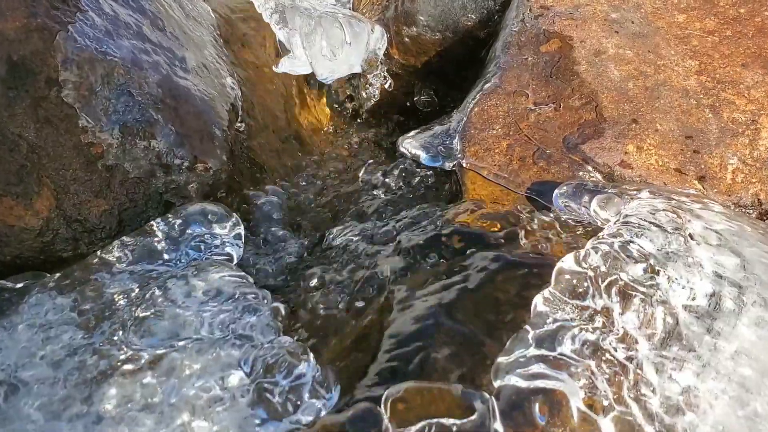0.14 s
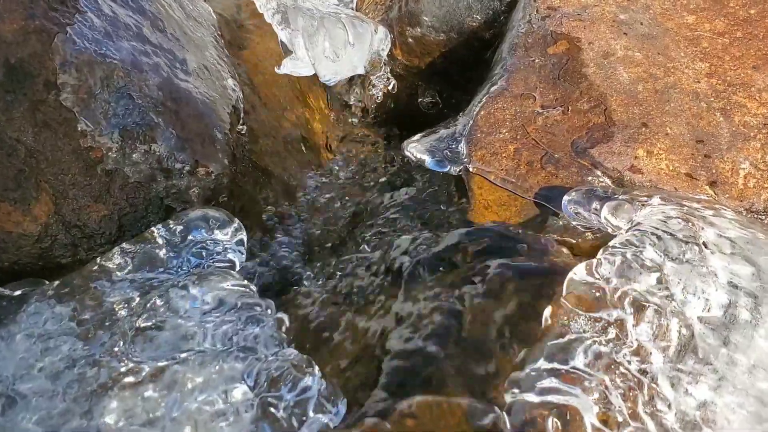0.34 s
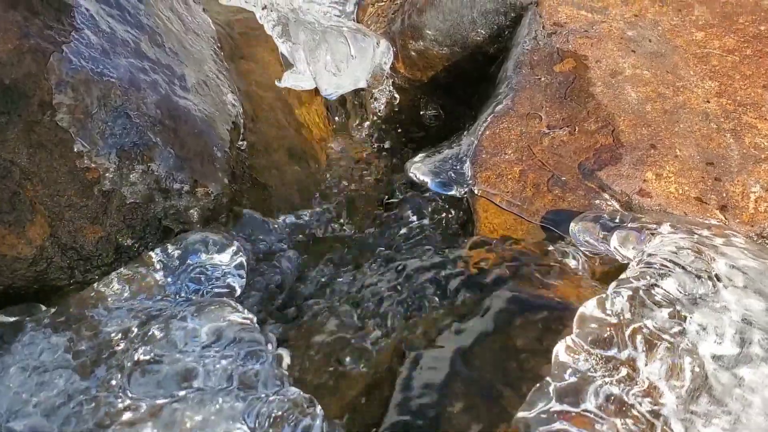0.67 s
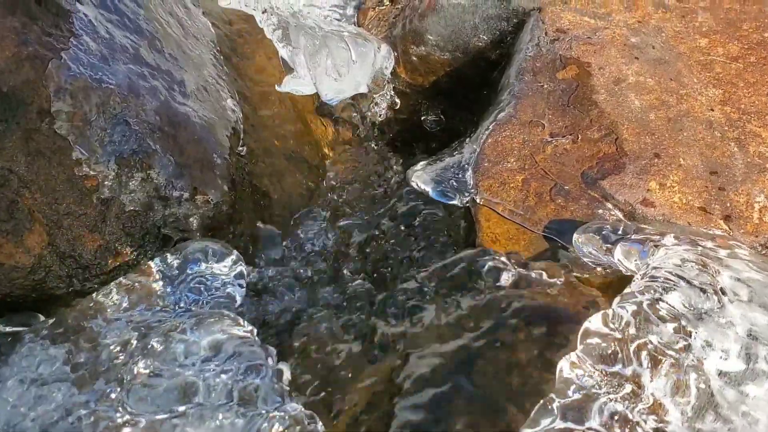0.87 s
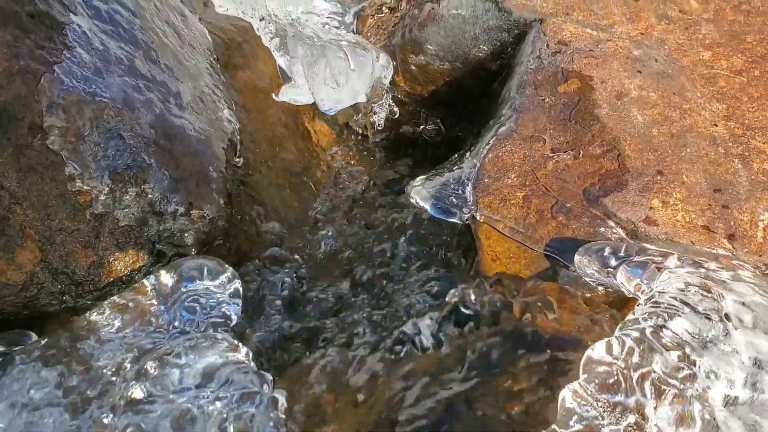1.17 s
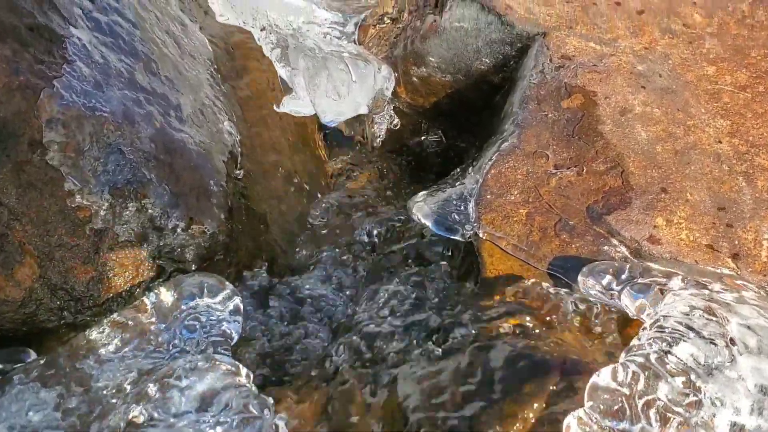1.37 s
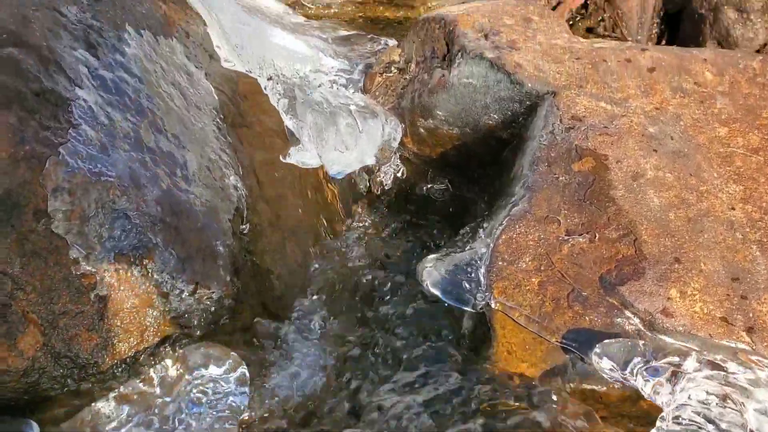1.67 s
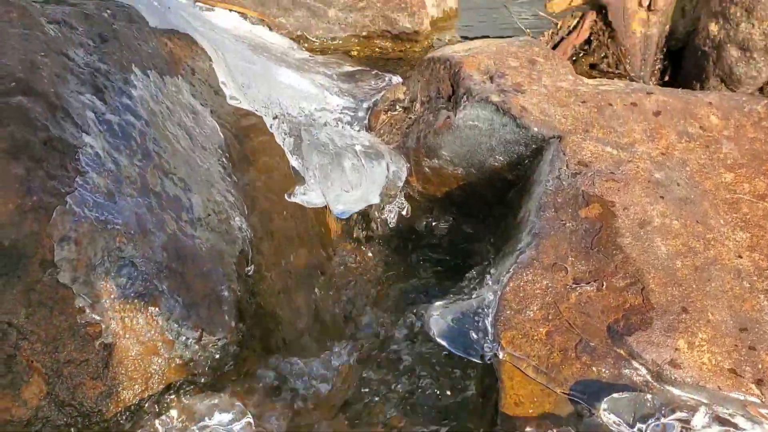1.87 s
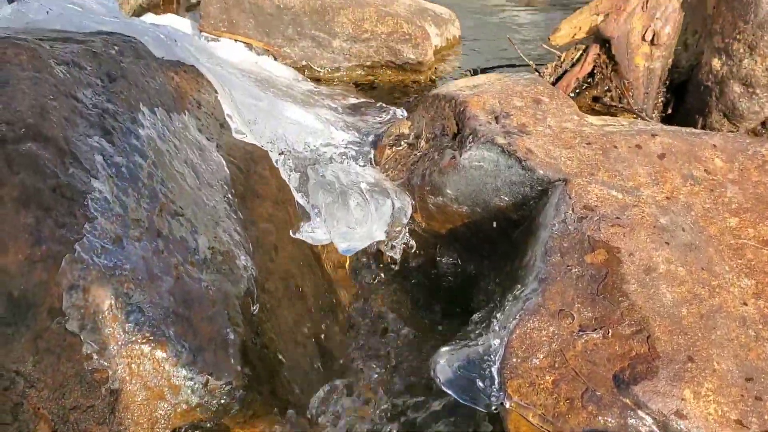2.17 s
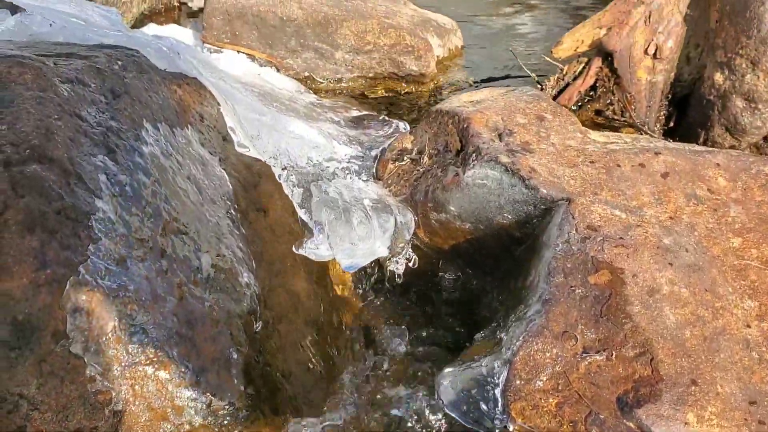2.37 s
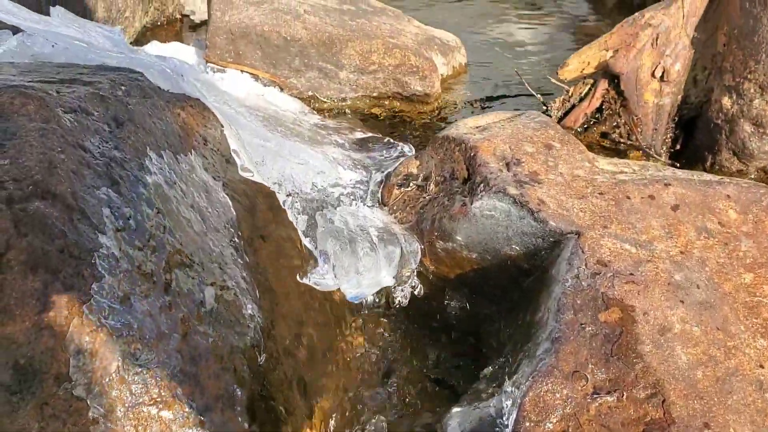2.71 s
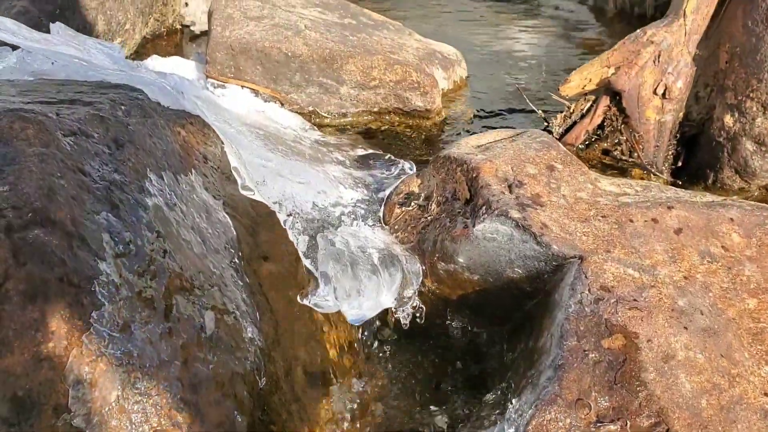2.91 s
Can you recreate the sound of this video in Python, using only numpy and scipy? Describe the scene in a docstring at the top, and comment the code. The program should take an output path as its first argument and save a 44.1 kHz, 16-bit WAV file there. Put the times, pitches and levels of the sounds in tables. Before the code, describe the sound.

A small stream runs between icy rocks about a metre away, gurgling throughout with bubble plinks, hollow gulps and drops ticking on stone. From about 0.3 seconds, gusts buffet the microphone with a low, fluttering rumble, hardest at 1.2 seconds. The wind eases after 1.5 seconds, returns from 2.1 to 2.5 and dies down towards 3 seconds, while the water runs on.

```python
"""A small mountain stream runs between icy rocks, about a metre from a two-port microphone.
From the start, trapped air gurgles, bubbles ring and drops tick, all reflected by the stones.
From 0.3 s, gusts buffet the ports, hardest at 1.2 s. The wind eases after 1.5 s, returns
from 2.1 to 2.5 s and dies down towards 3 s. The water runs on to the end."""
import sys
import numpy as np
from scipy import signal
from scipy.fft import rfft, irfft
from scipy.io import wavfile
from scipy.ndimage import uniform_filter1d

SR = 44100
rng = np.random.default_rng(int(sys.argv[2]) if len(sys.argv) > 2 else 0)


def store_wav(level_fs):
    """Save 16-bit WAV to argv[1]."""
    pcm = np.round(np.clip(np.atleast_2d(level_fs), -1, 1) * 32767)
    wavfile.write(sys.argv[1], SR, pcm.T.astype(np.int16))


N = 134505
T = np.arange(N) / SR

# Wind rumble and fine turbulence. Each row: time in seconds, relative level in dB.
RUMBLE_CURVE = [(0.0, -36.5), (0.16, -44), (0.47, -23), (0.5, -35.5), (0.61, -26), (0.76, -29), (0.93, -23),
                (0.94, -21.5), (1.16, -28), (1.2, -24), (1.26, -23), (1.46, -24), (1.6, -33.5),
                (1.67, -29.5), (1.79, -34), (1.83, -29), (2.17, -28.5), (2.19, -28.5), (2.39, -27.5),
                (2.44, -27), (2.66, -33.5), (2.73, -27.5), (3.03, -44), (3.05, -37)]
FLUTTER_CURVE = [(0, -44), (.14, -48), (.3, -44), (.43, -28), (.5, -34), (.6, -29), (.87, -24.5),
                 (1.05, -35), (1.2, -25), (1.28, -48.5), (1.44, -22), (1.6, -38), (2, -37.5), (2.1, -22.5),
                 (2.16, -30), (2.23, -25.5), (2.32, -38.5), (2.47, -24.5), (2.55, -35), (2.85, -35),
                 (2.92, -71), (3.05, -37)]
# Lulls between puffs. Each row: centre in seconds, half length in seconds, depth in dB.
LULLS = [(0.478, 0.013, 16), (0.558, 0.0084, 4), (0.692, 0.013, 7), (0.778, 0.012, 21), (0.896, 0.014, 14),
         (0.95, .018, 14), (1.044, .015, 3), (1.305, 0.0089, 23), (1.588, 0.0079, 7), (1.718, .012, 14),
         (1.75, 0.015, 21), (1.806, 0.024, 16), (1.91, 0.014, 20), (1.982, 0.011, 15), (2.172, 0.01, 10),
         (2.333, .014, 7)]
# Eddies at the ports. Each row: start in seconds, relative level in dB, nominal pitch in Hz.
EDDIES = [(0.337, -12.5, 85), (.385, -20, 131), (0.448, -13.5, 72), (0.541, -9, 244), (0.586, -9.5, 84),
          (0.62, -9, 123), (0.666, -14.5, 73.6), (0.741, -8, 245), (0.796, -13, 169), (.809, -7, 136),
          (0.827, -13, 108), (.853, -8, 207), (0.911, -6, 93), (1.189, -3.5, 86), (1.203, -1.5, 87.5),
          (1.328, -12, 162), (1.382, -24, 84), (1.411, -22, 130), (1.426, -12.5, 218), (1.465, -7.5, 125),
          (1.608, -20, 112), (1.827, -14, 111), (1.858, -17, 85.4), (1.943, -17.5, 82), (2.02, -14, 101),
          (2.046, -16, 132), (2.074, -17, 248), (2.102, -10, 282), (2.19, -9, 99), (2.193, -8.5, 294),
          (2.225, -13.5, 128), (2.246, -7, 316), (2.261, -10.5, 70.6), (2.445, -8.5, 199),
          (2.455, -7.5, 197), (2.73, -11.5, 63.4), (2.858, -14, 78), (2.99, -21, 91)]
# Water churn and thrown spray. Each row: time in seconds, relative level in dB.
FLOW_CURVE = [(0, -35), (.14, -33), (.45, -35), (.6, -37), (.75, -32.5), (.9, -37), (1.5, -34.5),
              (1.65, -38), (2.05, -35.5), (2.3, -36.5), (2.6, -36), (2.82, -34.5), (3.05, -37)]
SPRAY_CURVE = [(0, -60), (.14, -43), (.21, -50.5), (.45, -49), (.66, -53), (.76, -43), (.8, -44),
               (1.0, -52), (1.56, -46.5), (1.66, -49.5), (2.05, -47.5), (2.3, -48), (2.65, -55),
               (2.88, -47.5), (3.05, -46.5)]
# Drops on stone. Each row: peak time in seconds, relative tick and slap levels in dB.
SPLASHES = [(0.122, -23, -22), (.2705, -20.5, -26), (0.368, -19.5, -37), (0.417, -16, -34),
            (.459, -30, -42), (.477, -28, -40), (0.7298, -19, -34), (1.072, -24.5, -41), (1.14, -21, -34),
            (1.177, -19.5, -32), (1.246, -22.5, -36), (1.3136, -24, -49), (1.3957, -18.5, -52),
            (1.597, -20.5, -30), (1.698, -23.5, -38), (1.765, -21.5, -31), (1.967, -23.5, -46),
            (2.052, -25, -23), (2.058, -28, -32), (2.179, -28, -34), (2.452, -21, -26), (2.536, -19, -22),
            (2.541, -16, -16), (2.8105, -26.5, -32), (2.8415, -22.5, -23), (2.932, -17.5, -20),
            (2.959, -29, -42)]
# Small bubbles. Each row: start in seconds, relative level in dB, initial pitch in Hz, decay in cycles.
PLINKS = [(0.105, -17.5, 2510, 5.2), (.193, -19, 1060, 2.8), (0.304, -16, 3130, 9),
          (.342, -22.5, 3570, 3.3), (0.402, -25, 2270, 4.9), (0.701, -18.5, 3800, 3.6),
          (0.919, -24.5, 2850, 5), (0.9937, -20.5, 2900, 4.2), (1.15, -20.5, 2670, 8.8),
          (1.325, -19, 2450, 6.7), (1.4779, -17, 2330, 6.3), (1.556, -24, 2630, 2.7),
          (1.6715, -26, 4640, 5.4), (1.721, -25.5, 3870, 6.6), (1.947, -19.5, 4400, 3.8),
          (2.06, -26, 2550, 4), (2.176, -21, 1290, 3.7), (2.4487, -22, 3170, 4.6),
          (2.5351, -19.5, 3450, 2.4), (2.599, -18.5, 3090, 3), (2.698, -25, 3430, 6.1),
          (2.78, -18.5, 3800, 4.7), (2.818, -19.5, 1630, 3.5), (2.888, -26, 3600, 5.4)]
# Large air pockets going under. Each row: start in seconds, relative level in dB, initial pitch in Hz.
GULPS = [(.055, -22, 690), (.112, -22.5, 375), (0.126, -16, 303), (0.136, -16, 823), (.222, -19, 363),
         (.272, -33, 536), (.515, -21, 426), (.54, -21, 400), (.665, -16, 950), (.703, -19, 610),
         (.958, -22.5, 540), (1.325, -19.5, 477), (1.443, -24, 580), (1.503, -19, 590), (1.767, -15.5, 614),
         (1.79, -19, 814), (1.807, -21, 1000), (2.074, -22, 514), (2.192, -18, 593), (2.228, -14, 434),
         (2.246, -21.5, 570), (2.399, -21, 435), (2.54, -24, 815), (2.779, -18.5, 1370), (2.808, -17, 824),
         (2.839, -18.5, 590)]
# Source spectra. Each row: frequency in Hz, relative gain in dB.
MIST_EQ = [(1500, -4), (4000, 7), (6800, -7.5), (7800, 9.5), (11000, -16.5), (13500, 13), (15500, -3)]
RUMBLE_EQ = [(20, -18), (40, -16.5), (60, -6.5), (88, -7), (115, -12), (170, -15.5), (300, -25.5),
             (700, -71)]
FLUTTER_EQ = [(60, -46), (150, 1.5), (250, 0), (400, -2), (600, -10.5), (1000, -26), (2500, -73)]
GURGLE_EQ = [(100, -28), (250, -4), (450, 0.5), (650, 0), (950, -4), (1300, -13.5), (2000, -12),
             (4000, -45)]
TICK_EQ = [(1000, -22), (3000, -11), (7000, 3), (9000, -8), (13000, -5.5), (16000, -12)]
SLAP_EQ = [(400, 0), (1000, 5), (2000, -0.5), (3500, 0), (6000, -21.5), (12000, -25)]
WATER_EQ = [(500, 7.5), (1000, 3.5), (1400, 0.5), (1900, 2), (2400, 2), (3300, -2.5), (4200, -5),
            (5200, -7.5), (6800, -5), (7800, -14), (11000, -11), (13500, -13.5), (15500, -27)]
SPRAY_EQ = [(1000, 8), (3000, 1.5), (6800, -1.5), (7800, 1.5), (11000, 1), (13500, -3.5), (15500, 15.5)]
# Water at the right port against the left. Each row: frequency in Hz, gain in dB.
RIGHT_PORT_EQ = [(250, 2.5), (600, 0.5), (2500, 1.54), (5000, 1.5), (8000, -0.5), (13000, -0.6)]

PORT_LAG_S, LAG_SPREAD_S = 0.00025, 0.00016  # the right port hears the water later
BURST_ATTACK_S, TICK_DECAY_S, SLAP_DECAY_S = 0.0012, 0.0018, 0.005
ROCK_ATTACK_S, ROCK_DECAY_S = 0.0018, 0.006
LOW_CUT_HZ, HIGH_CUT_HZ = 18.5, 15700


def undb(db):
    return 10 ** (np.asarray(db) / 20)


def unit(x):
    return x / np.sqrt(np.mean(x ** 2))


def curve(rows):
    """Gain along a (s, dB) curve."""
    return undb(np.interp(T, *np.array(rows).T))


def shape(x, eq):
    """Filter by a (Hz, dB) spectrum."""
    hz, db = np.array(eq).T
    bins_hz = np.maximum(np.fft.rfftfreq(N, 1 / SR), 1)
    return irfft(rfft(x) * undb(np.interp(np.log(bins_hz), np.log(hz), db)), N)


def colour(x, eq):
    """Filter, then scale to rms 1."""
    return unit(shape(x, eq))


def walk(rate_hz):
    """Slewed random steps, rms 1."""
    held = rng.standard_normal(2048)[(T * rate_hz).astype(int) % 2048]
    return unit(uniform_filter1d(held, int(SR / rate_hz)))


def add(channel, start_s, sound):
    part = channel[max(int(start_s * SR), 0):][:len(sound)]
    part += sound[:len(part)]


def ring(hz, decay_cycles, rise=0.04, onset_cycles=0.68):
    """Damped sine. Pitch gains the share `rise` per decay time, like a bubble near the surface."""
    turns = np.arange(int(6 * decay_cycles / hz * SR) + 2) * hz / SR
    swell = 1 - np.exp(-2 * turns / onset_cycles)
    phase = 2 * np.pi * turns * (1 + rise * turns / decay_cycles / 2)
    return swell * np.exp(-turns / decay_cycles) * np.sin(phase)


def burst(decay_s):
    """Noise puff, peaking three attack times in."""
    t = T[:2048] - 3 * BURST_ATTACK_S
    return rng.standard_normal(len(t)) * np.exp(np.minimum(t / BURST_ATTACK_S, -t / decay_s))


def swarm(count, low_hz, high_hz, decay_cycles, spread_db, lag_s=PORT_LAG_S):
    """Bubbles of random time, size, strength and place."""
    out = np.zeros((2, N))
    for when, size, strength, damping, place, side in rng.random((count, 6)):
        start_s = when * N / SR
        hz = low_hz * (high_hz / low_hz) ** size
        gain = undb(-spread_db * np.log(max(strength, 0.03))) * hz / low_hz
        bubble = gain * ring(hz, decay_cycles * (0.5 + damping))
        add(out[0], start_s, bubble * (0.5 + side))
        add(out[1], start_s + lag_s + LAG_SPREAD_S * (2 * place - 1), bubble * (1.5 - side))
    return out


def rocks(x, wet_db):
    """Add quick reflections from the stones, different at each port."""
    t = T[:2048]
    echo = rng.standard_normal((2, len(t))) * np.exp(-t / ROCK_DECAY_S) * np.minimum(t / ROCK_ATTACK_S, 1)
    echo /= np.sqrt(np.sum(echo ** 2, axis=1, keepdims=True))
    return x + undb(wet_db) * signal.fftconvolve(x, echo, axes=1)[:, :N]


def at_ports(x, wet_db):
    """A near sound reaches the left port first, then returns from the stones."""
    return rocks(np.array([x, np.roll(x, int(PORT_LAG_S * SR))]), wet_db)


def mist():
    """Far droplets blur into an even hiss."""
    return undb(-52.5) * colour(rng.standard_normal((2, N)), MIST_EQ)


def eddies(pitch_spread=0.12, scatter_s=0.0011):
    """Strong eddies push both ports for a cycle or two."""
    out = np.zeros((2, N))
    for start_s, db, hz in EDDIES:
        for port, detune, lag in zip(out, *rng.standard_normal((2, 2))):
            push = ring(hz * np.exp(pitch_spread * detune), decay_cycles=0.58, rise=0, onset_cycles=0.9)
            add(port, start_s + scatter_s * lag, 2 * undb(db + 2) * push)
    return out


def wind():
    """Turbulence rumbles and flutters at each port, with lulls between puffs and eddies on top."""
    rumble = rng.standard_normal((2, N)) * undb(3.2 * np.array([walk(16), walk(20)]))
    rumble = undb(4.5) * colour(rumble, RUMBLE_EQ) * curve(RUMBLE_CURVE)
    flutter = rng.standard_normal((2, N)) * undb(1.62 * walk(35.14) + 2 * np.array([walk(120), walk(120)]))
    flutter = undb(3.5) * colour(flutter, FLUTTER_EQ) * curve(FLUTTER_CURVE)
    lull_db = sum(db * np.exp(-((T - centre_s) / half_s) ** 2) for centre_s, half_s, db in LULLS)
    port_db = [[0.5], [-0.5]]
    return (undb(-lull_db) * (rumble + flutter) + eddies()) * undb(port_db)


def gurgle():
    """Large bubbles churn at the foot of a little fall."""
    churn = swarm(count=1100, low_hz=263.1, high_hz=1358, decay_cycles=3.34, spread_db=-0.5, lag_s=0.00024)
    return undb(-33.5) * colour(rocks(churn, wet_db=-9.5), GURGLE_EQ)


def splashes():
    """Drops hit stone: a sharp impact tick and a duller slap of water thrown aside."""
    ticks, slaps = np.zeros((2, N))
    for peak_s, tick_db, slap_db in SPLASHES:
        start_s = peak_s - 3 * BURST_ATTACK_S
        add(ticks, start_s, undb(tick_db - 1.26) * burst(TICK_DECAY_S))
        add(slaps, start_s, undb(slap_db - 1) * burst(SLAP_DECAY_S))
    return at_ports(shape(ticks, TICK_EQ) + shape(slaps, SLAP_EQ), wet_db=-6)


def near_bubbles():
    """Small bubbles pinch off with a crack and chirp upward; large pockets gulp."""
    tones, cracks = np.zeros((2, N))
    for start_s, db, hz, decay_cycles in PLINKS:
        plink = ring(hz, decay_cycles, rise=0.07, onset_cycles=1.36)
        add(tones, start_s + 0.00106, undb(db + 1) * plink)
        add(cracks, start_s, undb(db - 6) * burst(TICK_DECAY_S))
    for start_s, db, hz in GULPS:
        add(tones, start_s, undb(db) * ring(hz, decay_cycles=3))
    return at_ports(tones + shape(cracks, SLAP_EQ), wet_db=-4)


def running_water():
    """Small bubbles, a wash of finer ones and ticking spray surge together."""
    bubbles = swarm(count=4400, low_hz=1079, high_hz=12220, decay_cycles=5.4, spread_db=3.5)
    spray = swarm(count=7500, low_hz=2820, high_hz=13900, decay_cycles=3, spread_db=2.5)
    wash = rng.standard_normal((2, N)) * undb(3.4 * walk(90))
    body = undb(-3) * colour(rocks(bubbles, wet_db=-4), WATER_EQ) + undb(-3.5) * colour(wash, WATER_EQ)
    ticks = undb(2.5) * colour(rocks(spray, wet_db=-4), SPRAY_EQ)
    surge_db = walk(22.2) + walk(140) / 2
    return (body * curve(FLOW_CURVE) + ticks * curve(SPRAY_CURVE)) * undb(surge_db)


def scene():
    """The stream, slightly louder on the right, under the wind."""
    left, right = gurgle() + running_water() + near_bubbles() + splashes() + mist()
    return np.array([left, shape(right, RIGHT_PORT_EQ)]) + wind()


def record(dry):
    """The recorder cuts the deepest bass and the top treble."""
    low_cut = signal.butter(1, LOW_CUT_HZ, "high", fs=SR, output="sos")
    high_cut = signal.ellip(10, 0.2, 80, HIGH_CUT_HZ, fs=SR, output="sos")
    return signal.sosfilt(high_cut, signal.sosfilt(low_cut, dry))


dry = scene()
out = record(dry)
store_wav(out)
```